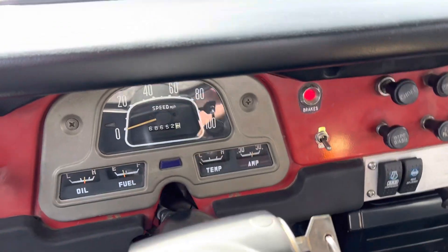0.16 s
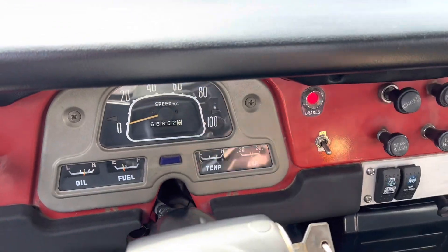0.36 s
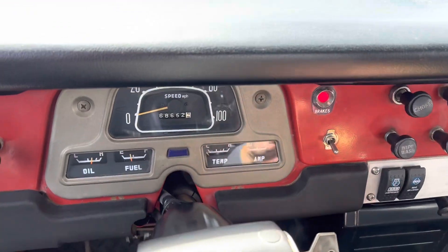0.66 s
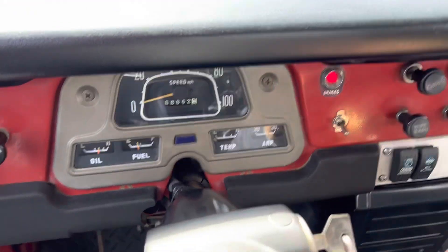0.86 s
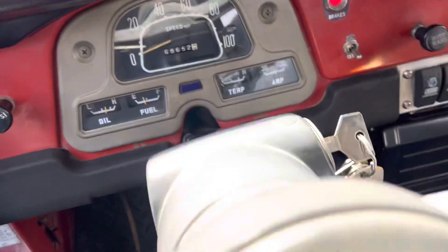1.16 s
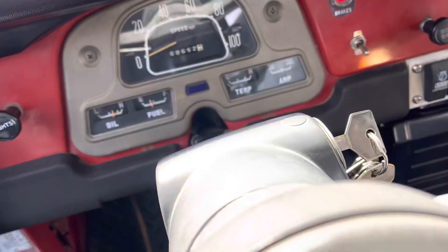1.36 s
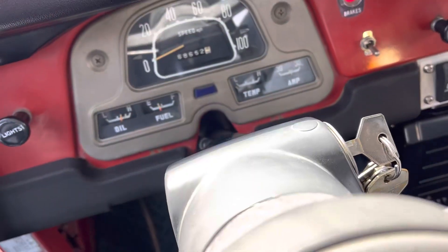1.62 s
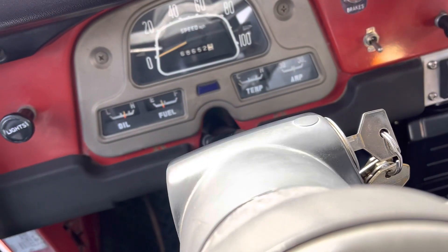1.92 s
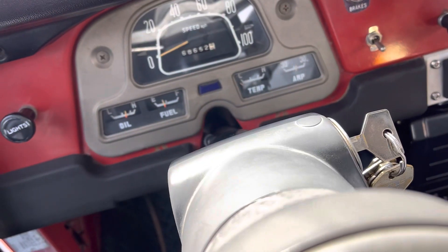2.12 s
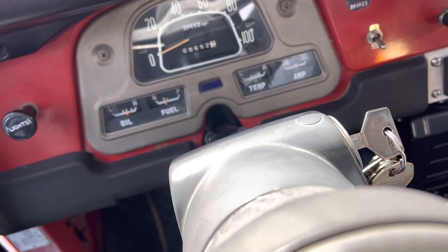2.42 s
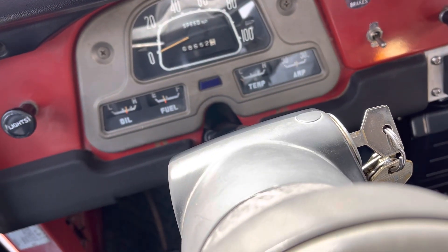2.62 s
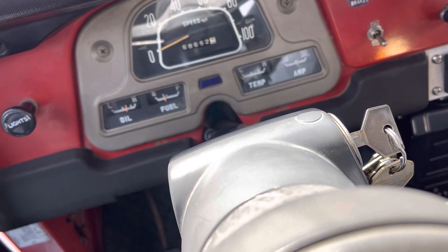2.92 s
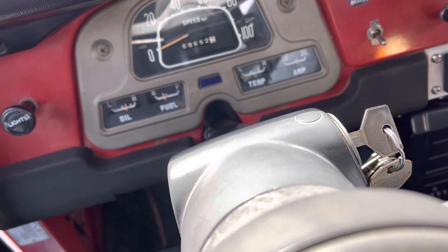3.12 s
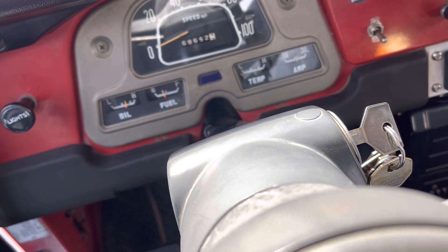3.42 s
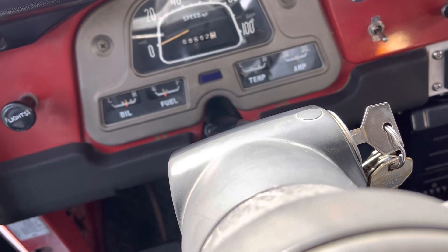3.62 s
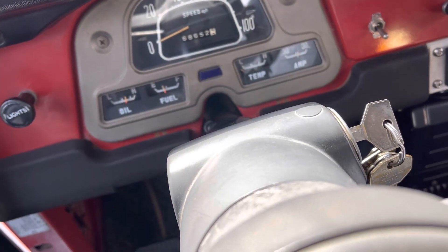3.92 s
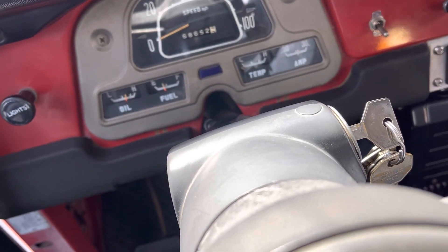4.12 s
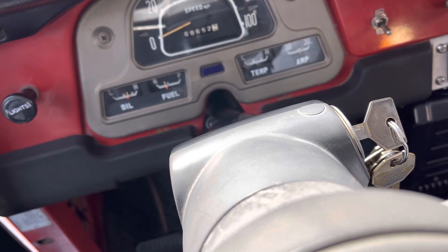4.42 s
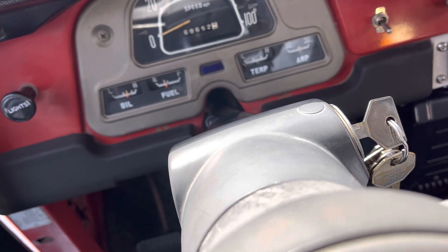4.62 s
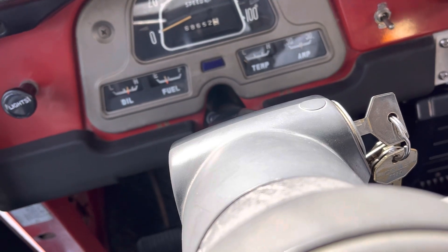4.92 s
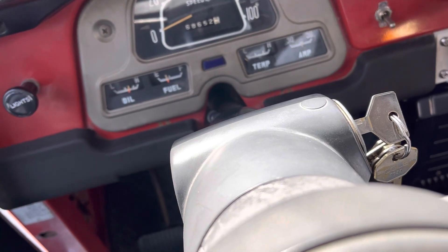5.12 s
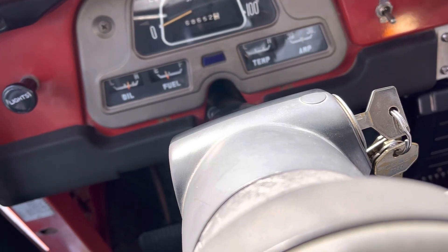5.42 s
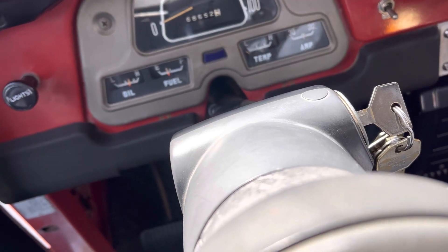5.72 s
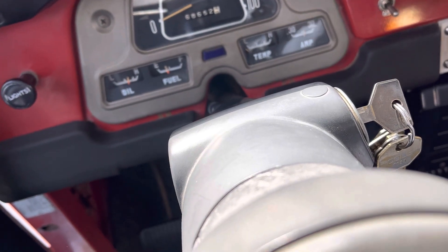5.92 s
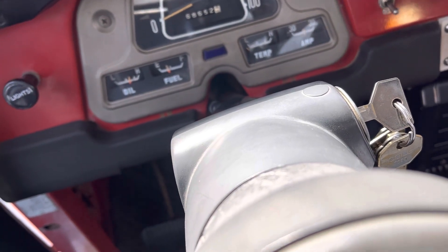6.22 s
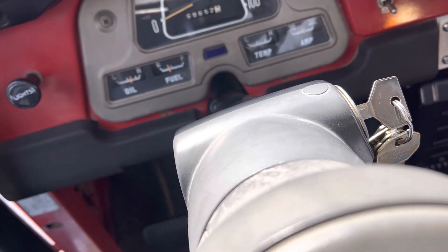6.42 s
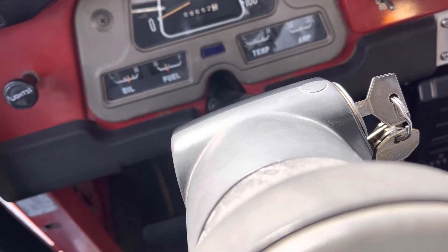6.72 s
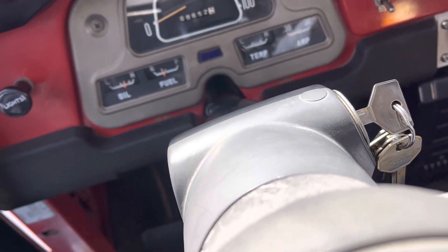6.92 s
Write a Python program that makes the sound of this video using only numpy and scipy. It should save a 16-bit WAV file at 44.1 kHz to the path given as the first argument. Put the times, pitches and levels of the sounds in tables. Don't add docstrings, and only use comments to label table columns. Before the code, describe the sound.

A cold six-cylinder engine drones at fast idle inside a bare steel cab, sagging in steps, with sharp pedal taps clacking close by.

```python
import sys
import numpy as np
from scipy import signal
from scipy.fft import rfft, irfft
from scipy.io import wavfile
from scipy.ndimage import uniform_filter1d

SR = 44100
rng = np.random.default_rng(int(sys.argv[2]) if len(sys.argv) > 2 else 0)


def attenuation_scalar(level_db):
    decades = np.asarray(level_db, float) / 20
    return 10 ** decades


def inscribe(sig):
    pcm = np.round(np.clip(np.atleast_2d(sig).T, -1, 1) * 32767)
    wavfile.write(sys.argv[1], SR, pcm.astype(np.int16))


N = 311339


def rms_one(x):
    return x / np.sqrt(np.mean(x ** 2) + 1e-20)


def in_time(rows):
    s, *columns = np.transpose(rows)
    t = np.arange(N) / SR
    return [np.interp(t, s, column) for column in columns]


def at_hz(points, hz):
    at, value = np.transpose(points)
    return np.interp(np.log(hz + 1), np.log(at + 1), value)


def drift(rate_hz):
    step = 40
    r = np.exp(-2 * np.pi * rate_hz * step / SR)
    coarse = rng.standard_normal(N // step + 2002)
    slow = signal.lfilter([1], [1, -2 * r, r * r], coarse)[2000:]
    return np.interp(np.arange(N) / step, np.arange(len(slow)), rms_one(slow))


def ring(clicks, modes, spread_db=0):
    out = 0
    for hz, level_db, t60_s in modes:
        r = attenuation_scalar(-60 / (t60_s * SR))
        w = 2 * np.pi * hz / SR
        struck = clicks
        if spread_db:
            struck = clicks * attenuation_scalar(spread_db * rng.uniform(-1.7, 1.7, N))
        gain = attenuation_scalar(level_db) * np.sin(w)
        out = out + signal.lfilter([0, gain], [1, -2 * r * np.cos(w), r * r], struck + 1e-18)
    return out


def soften(x, cut_hz):
    return signal.sosfilt(signal.butter(2, cut_hz, fs=SR, output="sos"), x)


def floor_cut(x):
    return signal.sosfilt(signal.butter(6, 42, "high", fs=SR, output="sos"), x)


def ports(common, diffuse, spectrum=None):
    # hz, likeness (0 to 1)
    likeness = [(60, 0.88), (130, 0.42), (280, 0.67), (620, 0.15), (1340, 0.29), (2900, 0.6), (6400, 0.44),
                (7600, 0.9), (9300, 0.88), (10000, 0.27), (10800, 1)]
    # hz, left_over_right_db
    lean = [(60, -8), (110, 1.5), (200, 14.5), (370, -2), (670, 4.5), (1230, -1.5), (2260, 3.5), (4130, 5),
            (7570, -0.5), (13800, -1)]
    # hz, left_leads_rad
    port_turn = [(0, 0), (430, -0.1), (1550, -3.0), (1890, -6.0), (2580, -5.2), (4570, -5.8), (5000, -5.7),
                 (5430, -7.5), (6460, -7.0), (7670, -9.42), (9300, -9.43), (10500, -12.3), (13600, -12.7),
                 (14000, -15.7)]
    hz = np.arange(N // 2 + 1) * SR / N
    alike = np.clip(at_hz(likeness, hz), 0, 1)
    phase = np.interp(hz, *np.transpose(port_turn))
    half = attenuation_scalar(at_hz(lean, hz) / 2) * np.exp(0.5j * phase)
    colour = 1 if spectrum is None else attenuation_scalar(at_hz(spectrum, hz))
    both = np.sqrt(alike) * rfft(common) + np.sqrt(1 - alike) * rfft(diffuse)
    return irfft(colour * both * [half, 1 / half], N)


def noise(spectrum):
    ripple = rng.standard_normal(N // 2 + 1)
    for _ in range(2):
        ripple = uniform_filter1d(ripple, size=110)
    ripple_db = 1.6 * rms_one(ripple)
    white = rng.standard_normal((3, N))
    white = irfft(rfft(white) * attenuation_scalar(ripple_db), N)
    return rms_one(ports(white[0], white[1:], spectrum))


def squeaks():
    # middle_s, length_s, pitch_hz, level_db
    belt_squeaks = [
        (1.48, 0.11, 6860, -63),
        (6.473, 0.15, 6600, -59.5),
    ]
    t = np.arange(N) / SR
    out = 0
    for s, length_s, hz, level_db in belt_squeaks:
        narrow = rms_one(ring(rng.standard_normal(N), [(hz, 0, 0.012)]))
        out = out + attenuation_scalar(level_db) * narrow * np.exp(-4 * ((t - s) / length_s) ** 2)
    return out


def air(turn, per_s):
    # firings_per_s, level_db
    boom_by_speed = [(56.2, -44), (58.3, -37.5), (59.5, -43), (61, -38.5), (64, -39.5)]
    # hz, level_db (per Hz)
    boom_colour = [(60, -28), (110, 6), (150, -1), (200, 6), (250, 1), (300, 2.5), (380, -41)]
    roar_colour = [(250, -32), (320, -12), (385, -6), (450, -7.5), (520, -7), (620, -14.5), (700, -12.5),
                   (770, -11.5), (850, -17), (1100, -18), (1600, -25), (2500, -47.5)]
    hiss_colour = [(900, -36), (1500, -1.5), (2300, 0), (3100, -2.5), (3600, -7), (4500, -6.5), (5600, -14),
                   (7100, -17), (9000, -21), (9900, -44.5)]
    leak_colour = [(8600, -12), (9800, -6), (11500, -5), (12600, -12), (13400, -20.5), (14200, -33),
                   (14800, -32.5)]
    faster = per_s - 58
    boom_db = at_hz(boom_by_speed, per_s) + 5.5
    roar_db = -33.5 + 0.19 * faster + 0.5 * drift(31) + 0.099 * np.cos(turn / 3)
    leak_db = -64.5 + 0.6 * faster
    throb_db = 1.2 * np.cos(turn / 2) + 0.5 * np.cos(turn / 6) + 0.4 * drift(25)
    low = noise(boom_colour) * attenuation_scalar(boom_db) + noise(roar_colour) * attenuation_scalar(roar_db)
    high = noise(hiss_colour) * attenuation_scalar(-43.5) + noise(leak_colour) * attenuation_scalar(leak_db)
    return low + attenuation_scalar(throb_db) * high


def taps():
    # start_s, peak_db, brightness_db, top_db (above 9 kHz), thump_db
    pedal_taps = [(2.24, -20, -7.5, -12.5, -9), (2.248, -30.5, -8, -11, -20), (3.306, -20.5, -5.5, -11, -1),
                  (3.553, -24.5, -18, -28.5, -8), (3.92, -36, -13, -27, -9), (4.086, -18.5, -12.5, -17, -1),
                  (4.368, -12, -3, -30.5, -1), (4.629, -9, -3, -37, 0), (4.879, -8.5, -4.5, -5, 0),
                  (5.1, -11.5, -4, -18.5, -3.5), (5.325, -23, -12, -6.5, -5), (5.337, -30.5, -13, -14, -8)]
    # pitch_hz, level_db, t60_s
    floor_modes = [(93, 4, 0.11), (140.6, -6.5, 0.18), (227, -5.5, 0.094), (389, 0, 0.042)]
    low_modes = [(925, -1.5, 0.0087), (1033, -6, 0.004), (1470, 0.5, 0.012), (1250, -7.5, 0.0046),
                 (1800, -3, 0.0074)]
    mid_modes = [(2540, -2.5, 0.0088), (3040, -0.5, 0.011), (3270, -5.5, 0.0064)]
    high_modes = [(4130, 1, 0.0071), (4700, -3, 0.0067), (5020, -19.5, .01), (6260, -0.5, 0.0071),
                  (6600, 1.5, 0.0034), (8500, -5, .005)]
    top_modes = [(10400, -2.5, 0.015), (11500, 2.5, 0.0097), (12700, -3.5, 0.0066), (14600, -19, .004)]
    # hz, level_db (per Hz)
    low_echo = [(200, -21), (450, -2), (720, -2.5), (1000, 4), (1260, -9), (1600, 3), (2000, -14.5),
                (2500, -25)]
    mid_echo = [(1900, -12.5), (2400, -10.5), (3100, -10.5), (3500, -12), (4000, -39)]
    high_echo = [(3000, -21), (3800, 4), (5400, 4), (7100, -2.5), (8700, -3), (9900, -36)]
    top_echo = [(8600, -11), (9800, 0), (10800, -8.5), (12500, -10), (14300, -30.5), (15800, -37.5)]
    s, peak_db, high_db, top_db, thump_db = np.transpose(pedal_taps)
    mid_db = -2.5 + 0.41 * high_db
    at = np.round(s * SR).astype(int)
    blows = np.zeros(N)
    blows[at + round(0.008 * SR)] = -attenuation_scalar(peak_db + thump_db)
    out = floor_cut(ring(soften(blows, cut_hz=334), floor_modes))
    # share_db, modes, echo colour, crack_db, echo_db, echo_t60_s
    registers = [
        (0, low_modes, low_echo, -2, -9, 0.16),
        (mid_db, mid_modes, mid_echo, 0, -9, 0.15),
        (high_db, high_modes, high_echo, -3, -8, 0.15),
        (top_db, top_modes, top_echo, 0, -11, 0.12),
    ]
    for share_db, modes, colour, crack_db, echo_db, t60_s in registers:
        hits = np.zeros(N)
        hits[at + 20] = attenuation_scalar(peak_db + share_db)
        crack = attenuation_scalar(crack_db) * ring(hits, modes, spread_db=1.5)
        glancing = np.array([np.roll(crack, 31), -np.roll(crack, 53)])
        decay = signal.lfilter([1], [1, -attenuation_scalar(-60 / (t60_s * SR))], hits + 1e-18)
        fading = soften(decay, cut_hz=400)
        out = out + ports(crack, glancing) + attenuation_scalar(echo_db) * noise(colour) * fading
    return out


def thuds(turn, thud_db):
    # pitch_hz, level_db, t60_s
    panels = [(52.7, -0.5, 0.23), (57.2, -3.5, 0.4), (92.4, -0.5, 0.56), (141.5, -9.5, 0.34),
              (76.8, -2.5, 0.39), (108.6, -12.5, 0.17)]
    # start_s, level_db
    stumbles = [
        (1.68, -20),
        (3.58, -19),
        (5.6, -15),
        (5.635, -15),
        (6.72, -20),
    ]
    fired = np.diff(np.floor(turn / (2 * np.pi)), prepend=0) > 0
    kicks = fired * rng.uniform(-0.94, 1, N)
    hard = np.zeros(N)
    for s, level_db in stumbles:
        hard[round(s * SR)] = attenuation_scalar(level_db)
    uneven = rms_one(floor_cut(ring(kicks, panels)))
    return attenuation_scalar(thud_db) * uneven + floor_cut(ring(hard, panels[2:4]))


def drone(turn, per_s, tone_db):
    # hz, level_db
    cab_second = [(112.3, -26), (113.4, -28.5), (115, -27.5), (116.2, -32.5), (118.2, -27), (121, -25.3),
                  (125, -27.5), (128, -30)]
    cab_third = [(168.5, -36.5), (171.5, -46), (174, -39), (177, -31.5), (180, -27.5), (185.3, -42.5),
                 (190.5, -33), (192.3, -27.5)]
    # times_firing_rate,
    # level_db, loudest_at_per_s, six_db_down_away_per_s
    minor_orders = [(7 / 3, -39, 59.0, 6.0), (8 / 3, -41, 56.0, 4.0), (10 / 3, -42, 59.5, 2.3),
                    (4.0, -40, 56.5, 3.0), (13 / 3, -41, 58.5, 2.2), (5.0, -45, 56.5, 3.0),
                    (6.0, -43, 64.0, 6.0), (7.0, -44, 56.2, 1.5)]
    orders = [
        (1, tone_db),
        (2, at_hz(cab_second, 2 * per_s)),
        (3, at_hz(cab_third, 3 * per_s)),
    ]
    for k, top_db, loudest, away in minor_orders:
        orders.append((k, top_db - 6 * ((per_s - loudest) / away) ** 2))
    out = 0
    for k, level_db in orders:
        skew = -1.2 if k > 1 else 0
        wander_db = 0.2 * drift(7.4)
        out = out + attenuation_scalar(level_db + wander_db) * np.cos(k * turn + skew)
    return np.sqrt(2) * out


def scene():
    # start_s, firings_per_s
    idle_speed = [(0, 63.9), (.6, 64.25), (.95, 63.8), (1.3, 61.6), (1.95, 58.75), (2.24, 59.15),
                  (2.8, 59.35), (3.15, 58.4), (3.4, 58.85), (4.0, 57.9), (4.76, 57.7), (5.15, 58.1),
                  (5.55, 56.2), (5.8, 56.15), (6.02, 56.7), (6.38, 56.2), (6.75, 57.3), (7.06, 57.8)]
    # start_s, tone_db, unevenness_db
    burns = [(0, -14, -19), (.3, -19, -27.5), (.6, -16, -23), (1.34, -17.5, -21), (1.8, -15, -26),
             (2.12, -16.5, -21.5), (2.95, -14, -26), (3.25, -17.5, -23), (3.5, -16, -19.5),
             (3.9, -14.5, -22), (4.1, -17, -30.5), (4.5, -16, -21), (4.9, -18.5, -23), (5.29, -15, -22),
             (5.6, -17.5, -25.5), (6.35, -15.5, -22), (6.65, -19.5, -25), (7.06, -15, -22)]
    per_s, = in_time(idle_speed)
    tone_db, thud_db = in_time(burns)
    turn = 2 * np.pi * np.cumsum(per_s) / SR
    background = squeaks() + air(turn, per_s) + taps()
    body = thuds(turn, thud_db) + drone(turn, per_s, tone_db)
    late = np.roll(body, 12)
    return np.array([body, late]) + background


def band_limit(x):
    return signal.sosfilt(signal.butter(12, 15900, fs=SR, output="sos"), x)


def record(dry):
    rounded = 1.3 * np.tanh(dry / 1.3)
    return band_limit(rounded)


dry = scene()
out = record(dry)
inscribe(out)
```